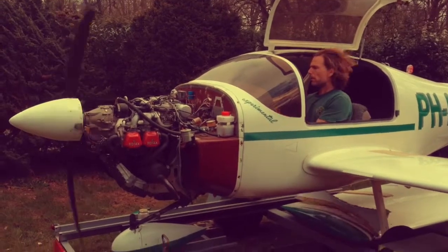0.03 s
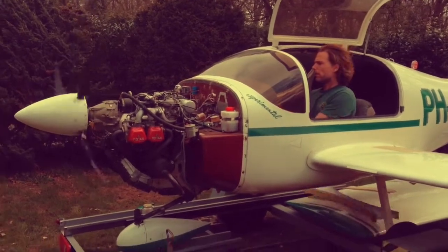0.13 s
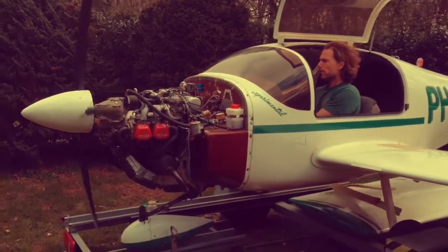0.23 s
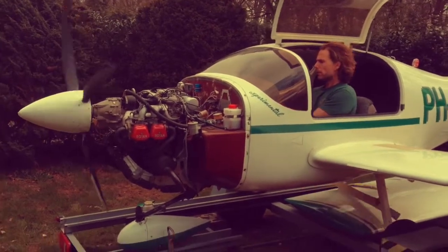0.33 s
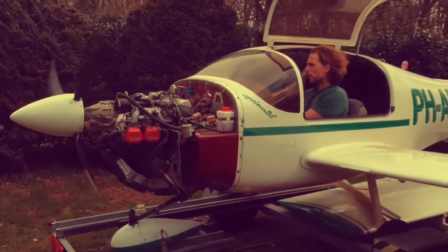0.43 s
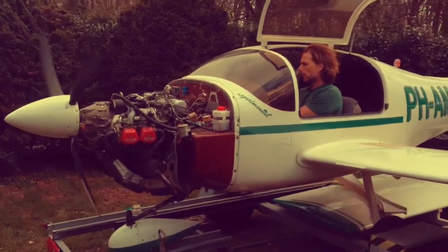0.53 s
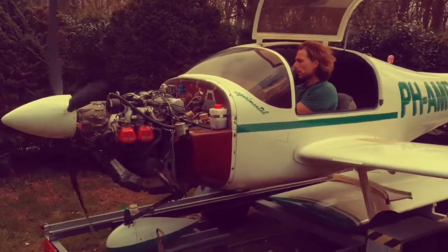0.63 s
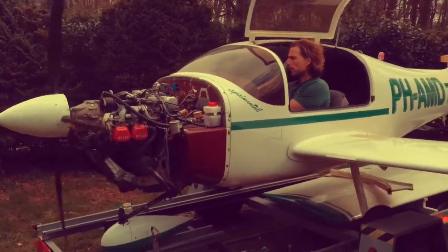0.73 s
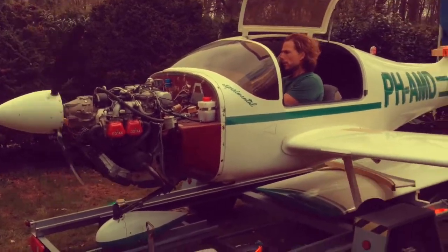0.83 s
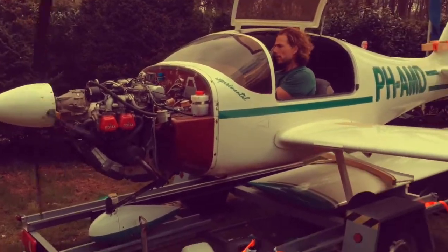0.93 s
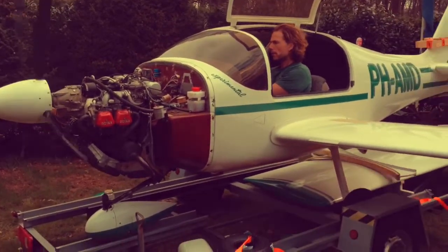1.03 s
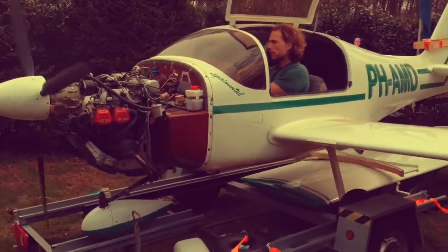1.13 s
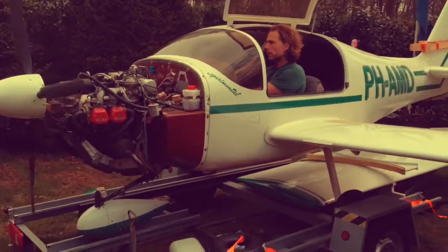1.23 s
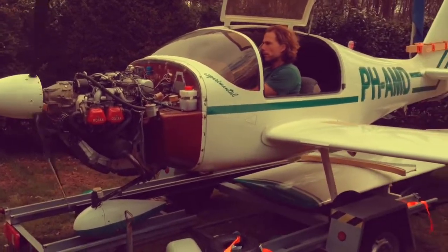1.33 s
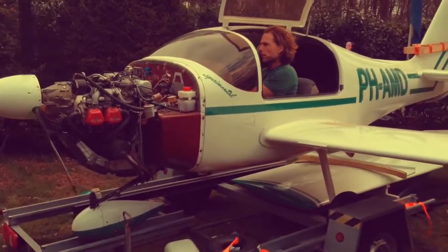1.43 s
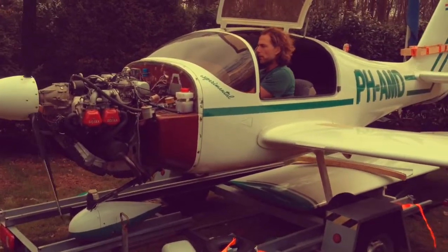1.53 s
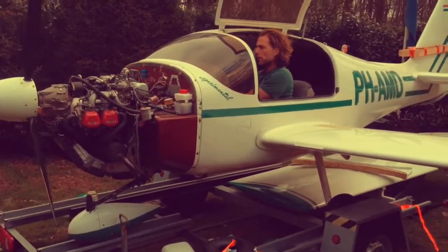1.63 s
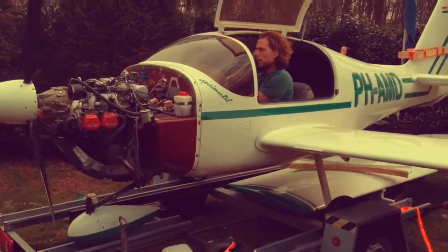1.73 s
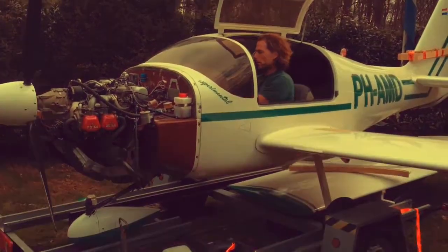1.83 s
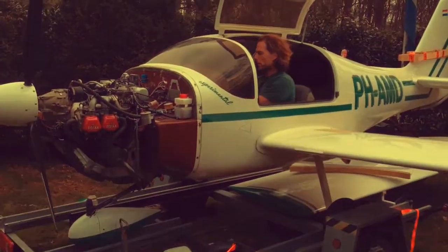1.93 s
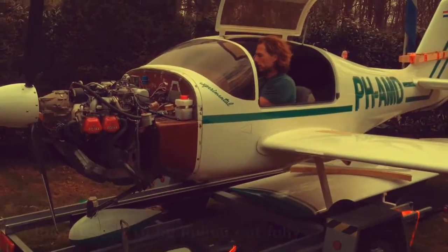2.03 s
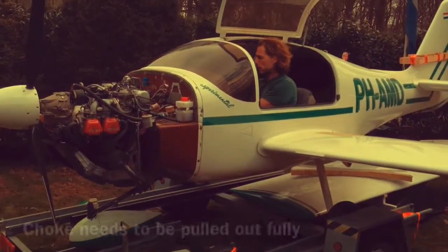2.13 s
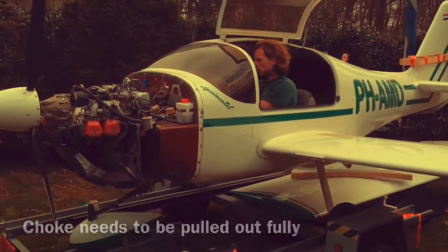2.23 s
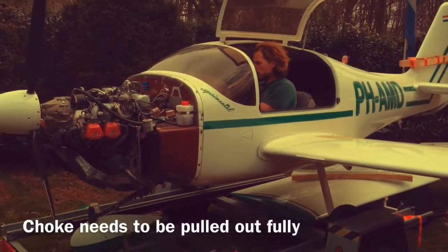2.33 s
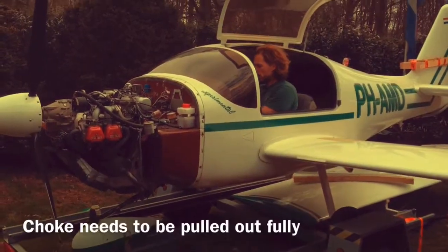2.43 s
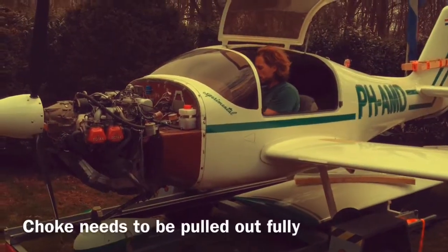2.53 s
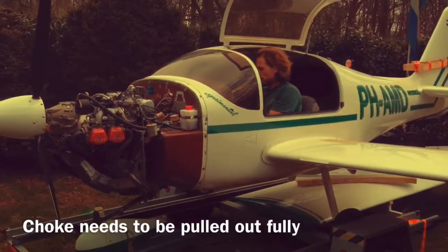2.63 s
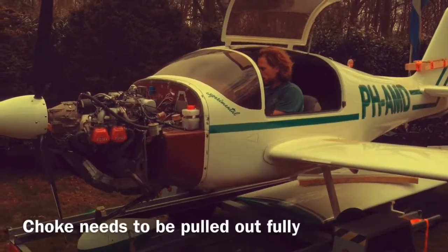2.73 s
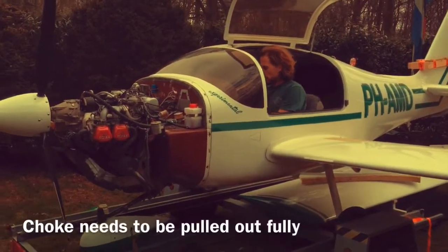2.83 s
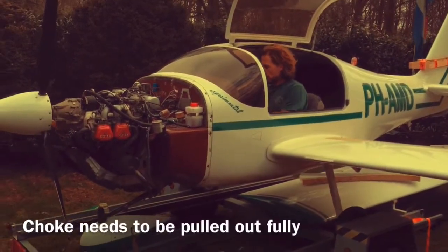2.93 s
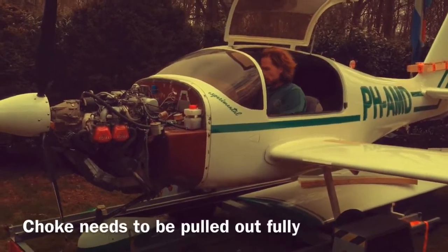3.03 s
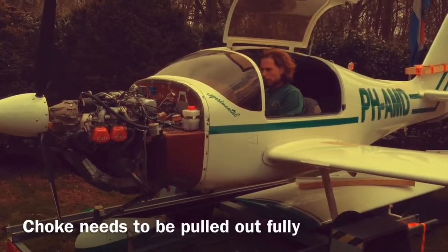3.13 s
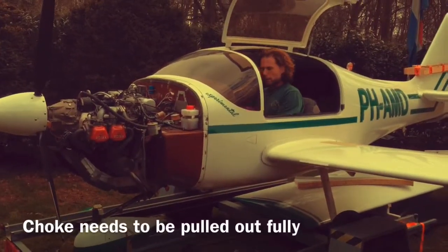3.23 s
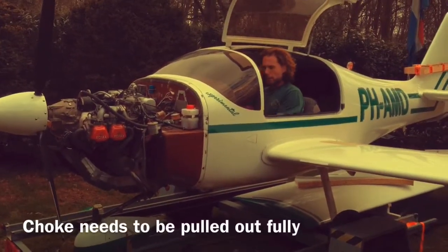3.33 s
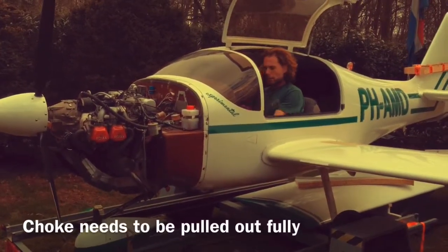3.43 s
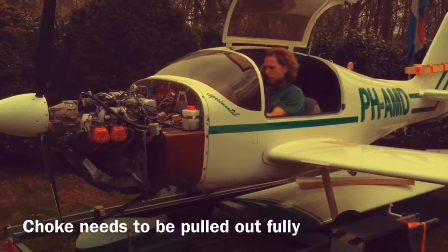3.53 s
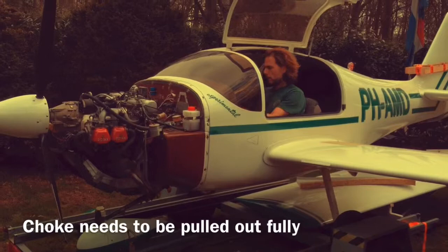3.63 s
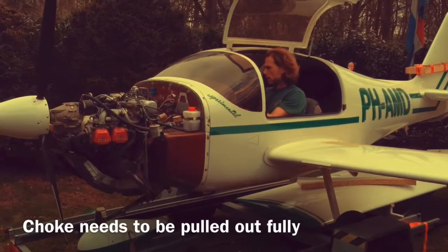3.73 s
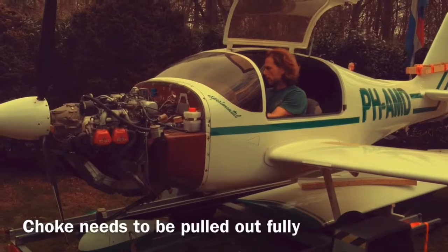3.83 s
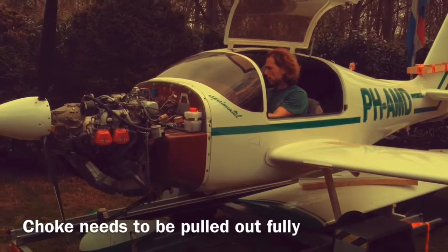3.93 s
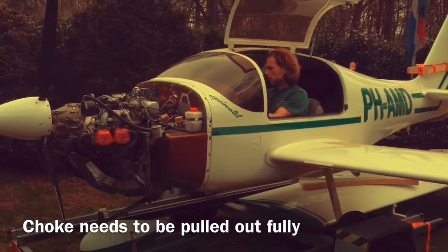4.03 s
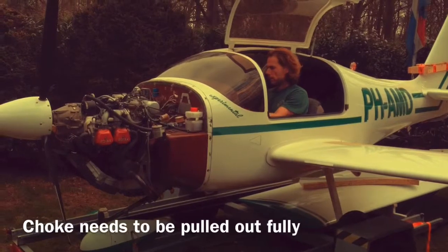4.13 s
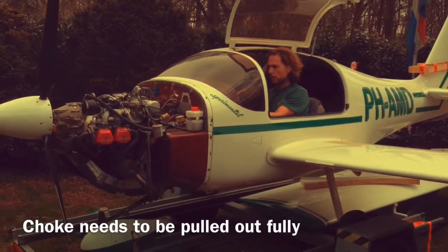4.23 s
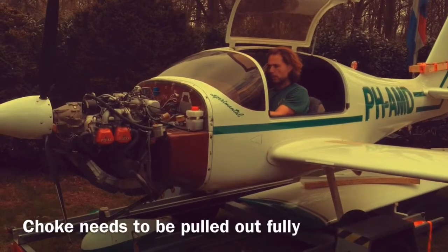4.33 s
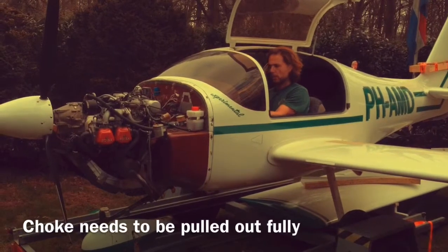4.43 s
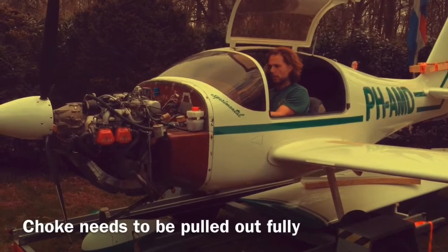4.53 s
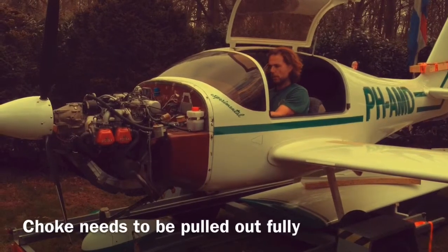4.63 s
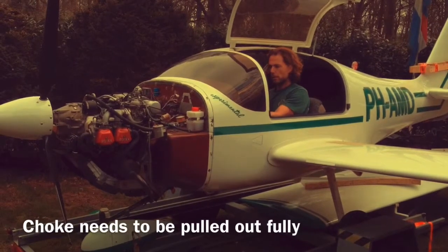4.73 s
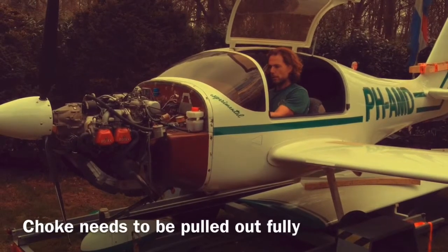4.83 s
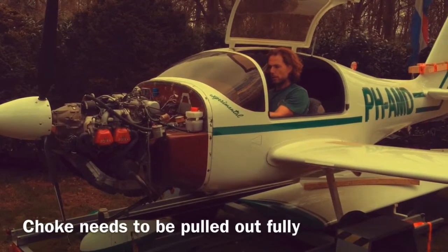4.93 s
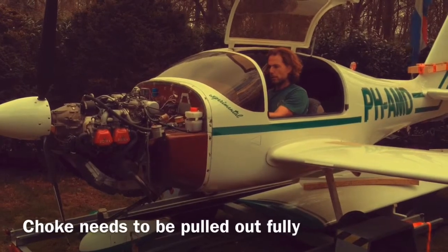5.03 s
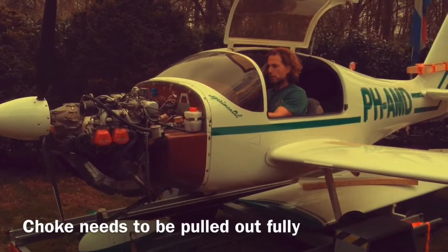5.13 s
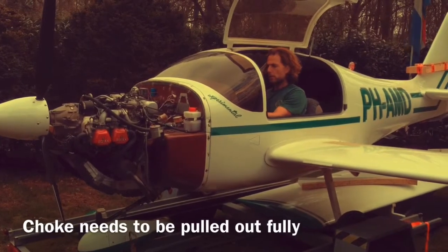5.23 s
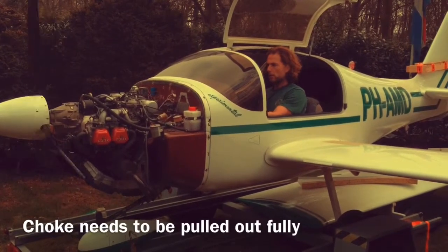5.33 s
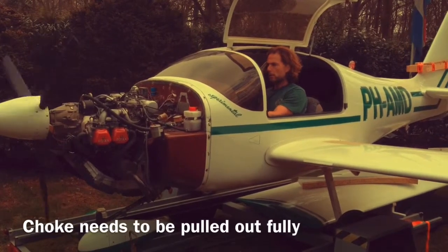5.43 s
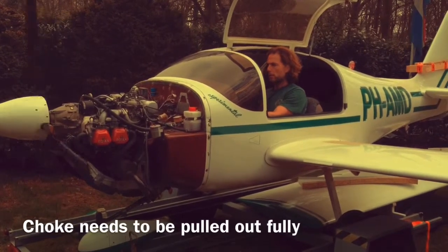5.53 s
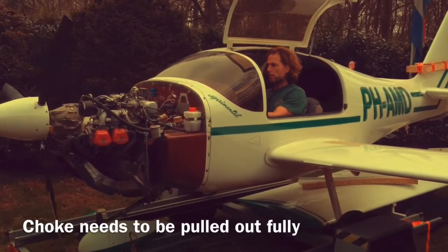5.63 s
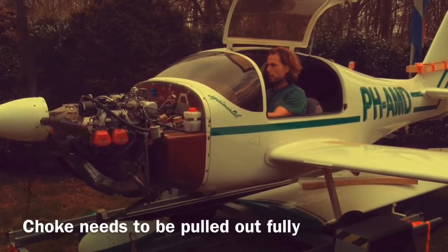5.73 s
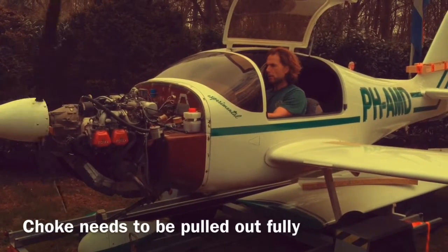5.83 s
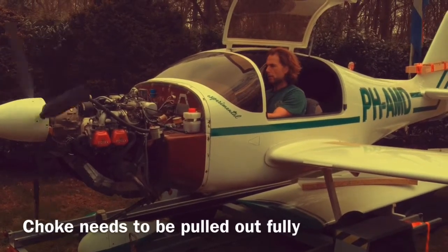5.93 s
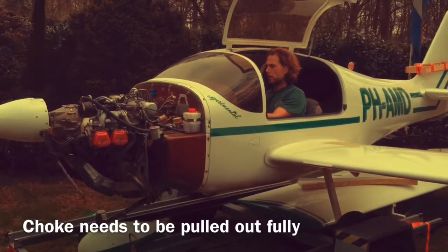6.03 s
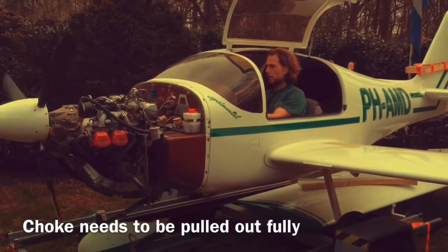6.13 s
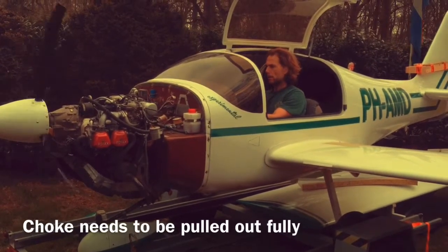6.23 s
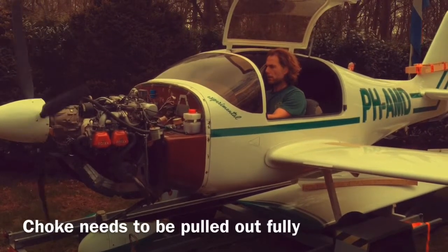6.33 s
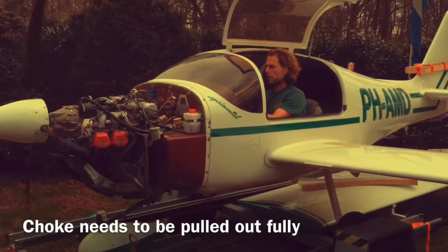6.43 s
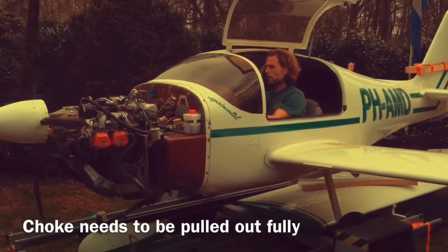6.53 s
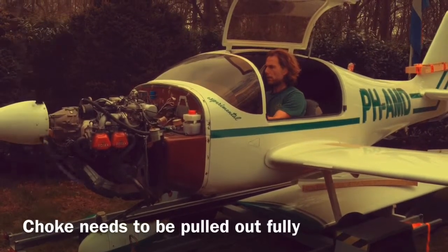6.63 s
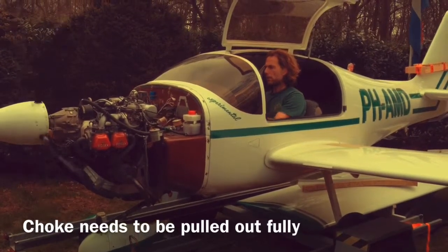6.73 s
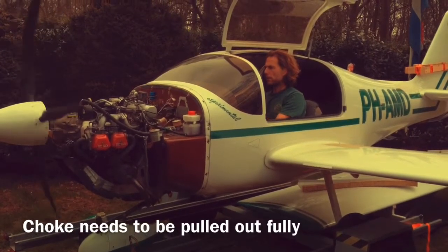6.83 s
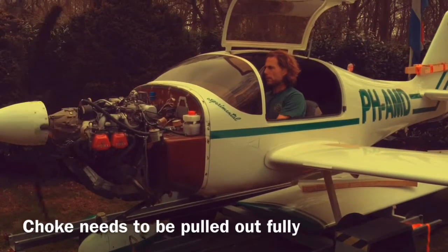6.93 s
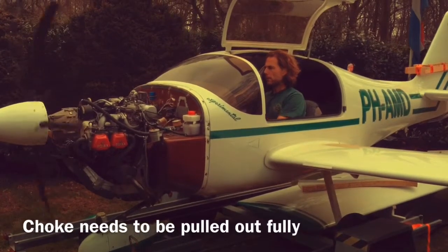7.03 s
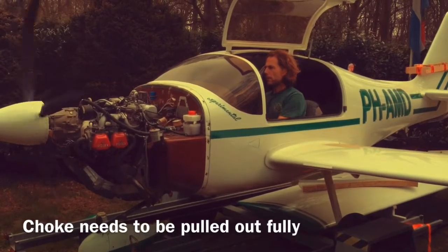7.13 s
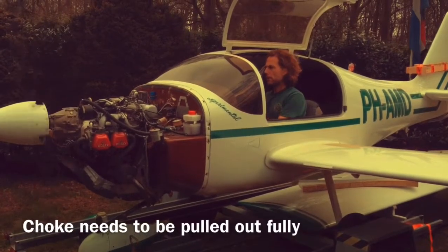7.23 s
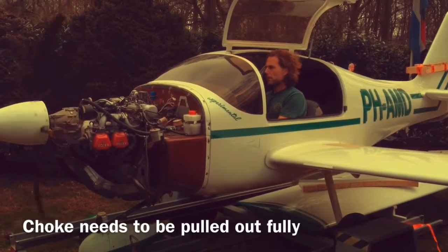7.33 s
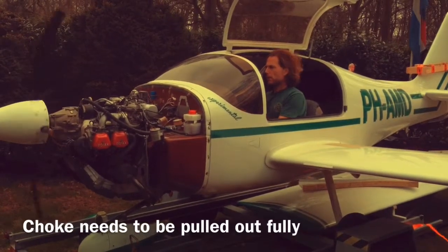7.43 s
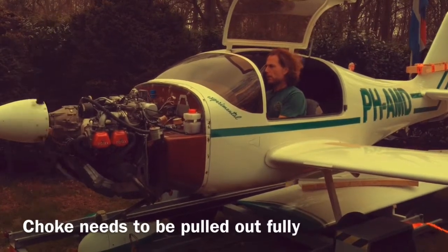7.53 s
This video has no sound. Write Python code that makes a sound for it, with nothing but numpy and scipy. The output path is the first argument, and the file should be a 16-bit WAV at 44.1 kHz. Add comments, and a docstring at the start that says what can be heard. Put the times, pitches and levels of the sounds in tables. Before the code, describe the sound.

A small aircraft piston engine sputters, knocks and dies; after a pause the starter whines and it fires again roughly.

```python
"""Light-aircraft engine in a garden

An uncowled four-cylinder on a trailer, a few metres from one microphone. It stumbles, the slack in its
propeller gearbox hammers, and it runs down. In the pause, faint birds and distant traffic. The starter
clicks in and whines through eight compressions; the engine fires, hammers again, picks up for a moment
and begins to falter."""
import sys
import numpy as np
from scipy import signal
from scipy.fft import rfft, irfft
from scipy.io import wavfile
from scipy.ndimage import uniform_filter1d

SR = 44100
rng = np.random.default_rng(int(sys.argv[2]) if len(sys.argv) > 2 else 0)


def dump_mix(stems):
    """Bounce the given channels to the path in sys.argv[1] as a 16-bit WAV at rate SR."""
    frames = np.atleast_2d(stems).T  # one column per channel
    limited = np.clip(frames, -1, 1)  # hard clip at full scale
    pcm = np.round(limited * 32767).astype(np.int16)
    wavfile.write(sys.argv[1], SR, pcm)


N = 333837
T = np.arange(N) / SR

# engine speed (time [s], firing rate [Hz])
FIRING_RATE = [(0, 62), (.3, 54), (.6, 42), (1, 33), (1.4, 22), (2.1, 12), (6.2, 15), (6.45, 36), (6.7, 47),
               (7, 60), (7.12, 66.5), (7.3, 70), (7.57, 65)]
# crankcase and gearbox modes (frequency [Hz], level [dB], nominal t60 [s])
CASING_MODES = [(614, -11.5, .11), (804, -4.5, 0.1), (888.5, 0.5, 0.09), (989, -3.5, .06), (1174, 0, 0.045),
                (1250, -7, 0.14), (1473, -12, 0.12), (1640, -5.5, 0.043), (1765.4, -1, 0.043),
                (1843, -7.5, 0.038), (1994, -2, 0.023), (2121, -3, 0.075), (2360, -8.5, 0.094),
                (3065, -12.5, 0.16), (3386, -12.5, 0.12), (3750, -21.5, .04)]
# a cranked piston passes the top of its compression (time [s], relative whine level [dB])
COMPRESSIONS = [(5.318, -39), (5.442, -20), (5.585, -18.5), (5.708, -21), (5.818, -18.5), (5.933, -19.5),
                (6.038, -16.5), (6.147, -21.5), (6.259, -16)]
# spectrum of the starter's gear train (frequency [Hz], level [dB])
GRIND_COLOUR = [(25, -29), (55, -9.5), (110, -13), (220, -18), (450, -15), (620, -9.5), (850, -0.5),
                (1090, -10), (1300, -9), (1480, -10.5), (1950, -6.5), (2760, -23.5), (3450, -17),
                (6600, -40), (15000, -68)]


def undb(db):
    """Decibels to gain."""
    return 10 ** (np.asarray(db) / 20)


def unit(x):
    """Scale to rms 1."""
    return x / np.sqrt(np.mean(x ** 2) + 1e-20)


def steady(x, size=4410):
    """Hold the short-term rms at 1."""
    return x / np.sqrt(np.abs(uniform_filter1d(x ** 2, size)) + 1e-4 * np.mean(x ** 2))


def curves(rows, at=T):
    """The later columns of a table, interpolated along the first."""
    axis, *columns = np.transpose(rows)
    return [np.interp(at, axis, column) for column in columns]


def gate(start, end, fade):
    """1 between two times, with sloping edges."""
    return np.clip((T - start) / fade, 0, 1) * np.clip((end - T) / fade, 0, 1)


def noise():
    """White noise."""
    return rng.standard_normal(N)


def walk(rate):
    """A random wander of rms 1 that turns `rate` times a second."""
    step = max(int(SR / rate), 1)
    stairs = np.repeat(rng.standard_normal(N // step + 1), step)
    return unit(uniform_filter1d(stairs, step)[:N])


def ring(x, hz, width):
    """One resonance, gain 1 at its centre."""
    return signal.lfilter(*signal.iirpeak(hz, hz / width, fs=SR), x)


def convolve(x, response):
    """Apply an impulse response with power gain 1."""
    return signal.fftconvolve(x, response / np.linalg.norm(response))[:N]


def colour(x, points, size=4096):
    """Minimum-phase filter through (frequency [Hz], level [dB]) points, with power gain 1."""
    hz, db = np.transpose(points)
    bins = np.maximum(np.fft.rfftfreq(size, 1 / SR), 1)
    cepstrum = irfft(np.log(undb(np.interp(np.log(bins), np.log(hz), db))))
    cepstrum[1:size // 2] *= 2
    cepstrum[size // 2 + 1:] = 0
    return convolve(x, irfft(np.exp(rfft(cepstrum))))


def casting(x, modes):
    """A metal casting rings at its modes when shaken by x."""
    click = signal.unit_impulse(SR // 8)
    response = sum((-1) ** k * undb(db) * ring(click, hz, 4 / decay)
                   for k, (hz, db, decay) in enumerate(modes))
    return convolve(x, response)


def blow(rise, t60, size=SR // 2):
    """Envelope of one impact, peak 1; rise and t60 in seconds."""
    t = T[:size]
    shape = (1 - np.exp(-t / rise)) * np.exp(-np.log(1000) * t / t60)
    return shape / shape.max()


def add(track, at, sound):
    """Mix a sound into a track from a time in seconds on."""
    part = track[int(at * SR):][:len(sound)]
    part += sound[:len(part)]


def blows(hits, rise, t60):
    """Envelope of a series of impacts (time [s], level [dB])."""
    force = np.zeros(N)
    for at, db in hits:
        add(force, at, undb(db) * blow(rise, t60))
    return force


def garden(hiss_db=-59, rumble_db=-61):
    """Distant traffic rumbles under a smooth hiss; both ebb a little."""
    # spectrum of the open air (frequency [Hz], level [dB])
    hiss_colour = [(12, -37), (20, -9), (53, -2), (80, 3), (183, -13.5), (796, -20.5), (889, -22),
                   (1590, -20), (2690, -28), (3270, -24), (15000, -32.5)]
    # ebb of the traffic (time [s], relative level [dB])
    traffic = [(2.6, 1.5), (3.3, 1), (3.8, -1.2), (4.6, -.3)]
    ebb_db, = curves(traffic)
    rumble = unit(ring(noise(), 60, 35.02) + .5 * ring(noise(), 130, 50))
    rumble *= undb(rumble_db + ebb_db + 1.5 * walk(6.4))
    return rumble + undb(hiss_db + .5 * ebb_db) * colour(noise(), hiss_colour)


def trees(x, t60):
    """Dull scatter from hedges, wing and trailer."""
    tail = blow(.02, t60) * rng.standard_normal(SR // 2)
    return convolve(x, signal.lfilter(*signal.butter(1, 3500, fs=SR), tail))


def birds(whistle_db=-74, twitter_db=-72.5, chirps=12, chirp_s=.09, chirp_octaves=-.25):
    """A far-off bird: warbled whistles and a high twitter of falling chirps, smeared by the trees."""
    # fluted notes (time [s], length [s], middle pitch [Hz], glide [octaves])
    whistles = [(3.004, 0.26, 3205, -.1), (3.501, .38, 3200, 0.11), (4.05, .28, 3150, -.2),
                (4.345, 0.07, 3000, .25), (4.429, 0.24, 2300, .3), (4.83, .13, 1750, 0.0024),
                (5.09, .2, 3100, -.3)]
    song, warble = np.zeros(N), 1 + .02 * walk(400)
    notes = [(*row, whistle_db) for row in whistles]
    notes += [(at, chirp_s, hz, chirp_octaves, twitter_db)
              for at, hz in zip(np.linspace(4.6, 6.6, chirps), rng.uniform(4300, 6460, chirps))]
    for at, length, middle_hz, glide, db in notes:
        progress = np.linspace(0, 1, int(length * SR))
        arch = np.abs(np.sin(np.pi * progress))
        octaves = glide * (progress - .5) + .05 * (arch - 1)
        hz = middle_hz * 2 ** octaves * warble[int(at * SR):][:len(arch)]
        add(song, at, undb(db) * np.sqrt(arch) * np.sin(2 * np.pi * np.cumsum(hz) / SR))
    song *= undb(3.5 * walk(45))
    return song + undb(-2) * trees(song, t60=.43)


def pump(at=1.755, rate_hz=17.1, tick_db=-54.5, fade_db_per_s=13):
    """A light, even ticking, likely the fuel pump, fades as the engine comes to rest."""
    ticks = [(at + s, tick_db - fade_db_per_s * s) for s in np.arange(18) / rate_hz]
    spectrum = [(100, -8.5), (300, 2.5), (900, 10), (1800, -6), (2700, -15.5), (5000, 2),
                (7000, -25), (15000, -32)]
    return colour(blows(ticks, rise=.001, t60=.04) * noise(), spectrum)


def settling_tick(at=2.833, db=-52):
    """One small metal part settles in the still engine."""
    spectrum = [(200, -2.5), (900, 0), (1800, -3), (2400, 1), (3200, -15), (8000, -28)]
    return colour(blows([(at, db)], rise=.0023, t60=.12) * noise(), spectrum)


def blades(at=1.365, ring_db=-41):
    """The last hard knock of the run-down leaves a faint ring, likely in the propeller blades."""
    # blade modes (frequency [Hz], relative level [dB], t60 [s])
    modes = [(540, 7, .75), (615, 5, 0.81), (760, -9, 1.4), (835, -11, 2.3), (880, -12, 2.4)]
    t = np.maximum(T - at, 0)
    tones = sum(undb(db - 60 * t / t60) * np.sin(2 * np.pi * hz * t) for hz, db, t60 in modes)
    return tones * undb(ring_db + 2 * walk(25))


def clunks(thud_db=-1, hub_db=-4):
    """The propeller rocks back; the gears take up their play with a double clunk that rings the hub."""
    # the gears meet (time [s], relative level [dB])
    contacts = [(2.244, -30), (2.267, -38)]
    # propeller hub modes (frequency [Hz], level [dB], nominal t60 [s])
    hub_modes = [(316, -2, .17), (485, 0, .15), (845, -4, .2), (1430, -9, 0.12), (1740, -6, .14),
                 (2293, -13, .1)]
    force = blows(contacts, rise=.0041, t60=.067)
    dull = [(70, -18), (170, -2), (380, 0), (850, -4.5), (1300, -10), (2100, -7), (2900, -23),
            (5500, -28), (15000, -49)]
    thud = undb(thud_db) * colour(force * noise(), dull)
    return thud + undb(hub_db) * casting(force * noise(), hub_modes)


def shudders(panel_hz=178):
    """At low speed the shaking engine sets an airframe panel humming."""
    # spells of humming (start [s], end [s], level [dB])
    spells = [(0.756, 0.86, -22.5), (6.402, 6.62, -19.5)]
    hz = panel_hz * (1 + .071 * walk(50))
    hum = np.sin(2 * np.pi * np.cumsum(hz) / SR) * undb(2 * walk(40))
    return hum * sum(undb(db) * gate(start, end, .074) for start, end, db in spells)


def cranking_breath(db=-47, hz=68, width_hz=45):
    """The cranked pistons push unburnt air through the silencer."""
    breath = unit(ring(ring(noise(), hz, width_hz), hz, 2 * width_hz))
    return undb(db) * gate(COMPRESSIONS[0][0], COMPRESSIONS[-1][0], .06) * breath


def gear_rattles(bite_s=5.383, bite_db=-22, lag_s=.017, rattle_db=-26):
    """Slack in the gear train is taken up as the starter bites, then just after compressions let go."""
    hits = [(bite_s, bite_db)] + [(top + lag_s, rattle_db) for top, _ in COMPRESSIONS[1:-1]]
    return colour(blows(hits, rise=.0037, t60=.068) * noise(), GRIND_COLOUR)


def solenoid(at=5.3165, snap_db=-23, thud_db=-27):
    """The starter contactor snaps shut and the pinion bumps home."""
    snap = blows([(at, snap_db)], rise=.0002, t60=.028) * noise()
    thud = blows([(at, thud_db)], rise=.0015, t60=.14) * noise()
    bright = [(100, -20), (700, 9.5), (2500, -5), (5000, 1), (9000, 1.5), (15000, -10)]
    return colour(snap, bright) + colour(thud, GRIND_COLOUR)


def starter(whine_db=-1.5, grind_db=-26, brush_db=-42):
    """The motor labours into each compression and spurts after it; its gear teeth whine and grind."""
    # one compression (share of the stroke [0-1], mesh rate once up to speed [Hz], load [dB])
    stroke = [(0, 850, -20), (.15, 1000, -10), (.35, 965, -5), (.55, 915, 0), (.78, 835, -5), (1, 780, -20)]
    # partials of the whine (multiple of the mesh rate, relative level [dB])
    gear_tones = [(1, 0), (2, -4.5), (16 / 7, -10), (3, -22), (4, -19)]
    tops, stroke_db = np.transpose(COMPRESSIONS)
    share = np.interp(T, tops, np.arange(len(tops))) % 1
    hz, load_db = curves(stroke, share)
    hz *= np.interp(T, [5.32, 5.5, 5.8], [.92, .99, 1])  # spinning up
    hz *= (1 + .014 * walk(12)) * (1 + .011 * walk(250))
    mesh = 2 * np.pi * np.cumsum(hz) / SR
    # the pinion runs slightly off centre and presses harder once a turn
    press = 1 + .22 * np.sin(mesh / 14 + walk(40))
    whine = sum(undb(db + 2 * walk(170)) * np.sin(k * mesh) for k, db in gear_tones)
    whine *= undb(whine_db + np.interp(T, tops, stroke_db) + load_db)
    teeth = unit(noise() * (1 + .49 * np.cos(mesh)) * undb(walk(200)))
    fizz = [(3000, -1.5), (7000, -5), (10000, -1.5), (15000, -18)]
    brushes = colour(noise() * undb(3.1 * walk(60)), fizz)
    grind = undb(grind_db) * colour(teeth, GRIND_COLOUR) + undb(brush_db) * brushes
    return gate(5.316, 6.27, .0033) * press * (whine + grind * undb(.38 * load_db))


def effort_at(at):
    """How hard combustion drives the crank."""
    # drive on the crank (time [s], effort [0-1])
    effort = [(0, 0.69), (.55, .68), (.9, 0.46), (1.1, 0.01), (6.15, 0), (6.23, .98), (7.32, 0.86),
              (7.43, 0.56), (7.57, 0.76)]
    return curves(effort, at)[0]


def loudness(law, idle_hz=60, coast_s=1.384, stop_s=2.7, catch_s=6.2):
    """Gain of one part of the engine: it grows with speed and effort and dies away while coasting."""
    idle_db, octave_db, effort_db, fade_db = law
    octaves = np.log2(curves(FIRING_RATE)[0] / idle_hz)
    coasted_s = np.maximum(T - coast_s, 0) * (T < catch_s)
    turning = gate(-1, stop_s, .12) + gate(catch_s, 9, .038)
    return turning * undb(idle_db + octave_db * octaves + effort_db * effort_at(T) - fade_db * coasted_s)


def throttle_air(hz, gas, even):
    """Air rushes past the throttle; under even firing it whistles, higher as the engine speeds up."""
    # loudness (at idle [dB], speed [dB/octave], full effort [dB], coasting loss [dB/s])
    law = (-45, 12, 14, 45)
    # spectrum of the rush (frequency [Hz], level [dB])
    spectrum = [(1500, -19), (2800, -2.5), (3600, 12), (4400, 6), (7000, 0), (11000, -2), (15000, -12.5)]
    rush = unit(colour(noise() + .43 * gas, spectrum))
    whistle_hz = 3660 * np.sqrt(hz / 67) * (1 + .013 * walk(500))
    whistle = np.sin(2 * np.pi * np.cumsum(whistle_hz) / SR) * undb(-7 + 3.9 * walk(80))
    return loudness(law) * (rush + even * whistle)


def clatter(cycles, strength, gas, case_db=-7, coast_db=4):
    """Valves tick twice a firing and the crankcase rings; coasting, the parts meet softly and dully."""
    # loudness (at idle [dB], speed [dB/octave], full effort [dB], coasting loss [dB/s])
    law = (-28.5, 0.3, 5, 66.5)
    # spectra of the ticking, running and coasting (frequency [Hz], level [dB])
    running_colour = [(88, -36), (150, 0), (404, 0), (467, -8.5), (593, -0.5), (700, -12.5), (781, 2),
                      (973, -16), (1190, -3), (1350, -7.5), (1780, -2), (2770, -17), (3580, -11),
                      (4140, -21.5), (12000, -37), (15600, -66), (22000, -120)]
    coasting_colour = [(100, -0.5), (200, 5), (450, -4.5), (620, 2), (830, 0), (1050, -4), (1850, -5),
                       (2700, -22.5), (3400, -18), (6000, -28.5), (15000, -50.5)]
    taps = strength * np.exp(-(2 * cycles % 1) / .15)
    ticks = steady(noise() * undb(2 * walk(500)) * (1.1 + taps))
    bright = colour(ticks, running_colour) + undb(case_db) * casting(gas, CASING_MODES)
    dull = undb(coast_db) * colour(ticks, coasting_colour)
    coasting = gate(1.26, 3, .17)
    return loudness(law) * ((1 - coasting) * bright + coasting * dull)


def intake(cycles, strength, gas, resonance_hz=411.5, trim_db=-3):
    """The intake honks, and sings when the sixth order of the firing rate reaches its resonance."""
    # loudness before the trim (at idle [dB], speed [dB/octave], full effort [dB], coasting loss [dB/s])
    law = (-30.5, 11.5, 5.5, 36)
    song = ring(strength * np.sin(6 * 2 * np.pi * cycles), resonance_hz, 40)
    honk = steady(ring(ring(gas, 385, 200), 370, 260))
    # the carburettor nearer the microphone gulps every second firing
    gulp = 1 + .65 * np.sin(np.pi * cycles + .6 * walk(25))
    return undb(trim_db) * loudness(law) * steady(gulp * (.5 * honk + 1.58 * song))


def exhaust(hz, cycles, strength, gas, even, silencer_hz=106, width_hz=17, trim_db=-2):
    """Ragged firing puffs, even firing drones; the silencer booms as the second order meets its pitch."""
    # loudness before the trim (at idle [dB], speed [dB/octave], full effort [dB], coasting loss [dB/s])
    law = (-25.3, 6, 5.5, 29.5)
    # spectrum at the tailpipe (frequency [Hz], level [dB])
    spectrum = [(20, -28), (40, -4.5), (62, 4), (105, 3.5), (150, -9.5), (185, -12), (260, -11),
                (500, -30.5), (1500, -64.5)]
    pulses = unit(np.diff(cycles.astype(int), prepend=0) * strength)
    puffs = steady(colour(.697 * pulses + gas, spectrum))
    boom_db = 7 * np.exp(-((2 * hz - silencer_hz) / width_hz) ** 2)
    orders = sum(np.sin(2 * np.pi * k * cycles) * undb(curves(spectrum, k * hz)[0] + (k == 2) * boom_db)
                 for k in range(1, 5))
    drone = steady(orders * strength) * undb(boom_db / 2)
    return undb(trim_db) * loudness(law) * (np.sqrt(even) * drone + np.sqrt(1 - even) * puffs)


def engine():
    """Each firing, of random strength, sends a burst of gas through exhaust, intake and crankcase."""
    # how evenly the cylinders fire (time [s], evenness [0-1])
    evenness = [(0, .4), (.3, 0), (6.4, .1), (6.65, 0), (6.8, 0.7), (7.35, .85), (7.5, 0.2)]
    even, = curves(evenness)
    hz, = curves(FIRING_RATE)
    cycles = np.cumsum(hz * (1 + .01 * walk(30))) / SR  # one cycle a firing
    strength = undb(3 * (1 - .15 * even) * rng.standard_normal(1024)[cycles.astype(int)])
    gas = steady(strength * np.exp(-(cycles % 1) / .54)) * noise()
    return (exhaust(hz, cycles, strength, gas, even) + intake(cycles, strength, gas)
            + clatter(cycles, strength, gas) + throttle_air(hz, gas, even))


def lone_firings(boom_hz=82, honk_hz=395):
    """A lone cylinder catches: the silencer booms and the intake honks."""
    # strong firings (time [s], relative boom level [dB], honk level [dB])
    catches = [(0.009, -16.5, -18), (0.033, -10.5, -27.5), (0.097, -10.5, -27.5), (0.148, -14.5, -23.5),
               (0.164, -21, -20.5), (0.222, -15.5, -17.5), (0.297, -18.5, -17), (0.754, -12.5, -30.5),
               (0.859, -15, -33.5), (6.727, -15, -25), (6.755, -15, -32), (7.477, -12.5, -18),
               (7.559, -12, -18)]
    out = np.zeros(N)
    for at, boom_db, honk_db in catches:
        detune = 1 + .04 * rng.standard_normal()
        turn = 2 * np.pi * detune * T[:SR // 2]
        boom = blow(.004, .07) * np.sin(boom_hz * turn)
        honk = blow(.012, .065) * (np.sin(honk_hz * turn) + .4 * np.sin(2 * honk_hz * turn))
        add(out, at, undb(boom_db - 1) * boom + undb(honk_db) * honk)
    return out


def clank(favoured_hz):
    """The casing rings after one blow; modes near the favoured pitch speak louder and linger."""
    out, t = 0, T[:SR // 6]
    for hz, db, t60 in CASING_MODES:
        detune, size, phase = rng.standard_normal(3)
        near = np.exp(-(np.log(hz / favoured_hz) / .11) ** 2)
        tone = np.sin(2 * np.pi * (hz * (1 + .018 * detune) * t + phase))
        envelope = blow(.003, t60 * (1 + .3 * near), len(t))
        out += undb(db + 2.6 * size + 9 * near) * envelope * tone
    return out / np.sqrt(uniform_filter1d(out ** 2, size=200).max())


def gearbox_knocks(ring_db=-2, body_db=-6, slack_hz=790, driven_hz=1818, rebound_bite=4):
    """The drive dogs scrape up their ramps, slam home and rebound: a crack, a ringing case, a shake."""
    # backlash (time [s], blow [dB], rebound delay [s], rebound [dB], crack against either hit [dB])
    backlash = [(.132, -22.5, 0.037, -18.5, -9), (.298, -20.5, 0.05, -15, -9.5),
                (.365, -7.5, 0.036, -12, -11), (.431, -13, .034, -11.5, -11), (.503, -16, .033, -14.5, -9),
                (.587, -14, 0.037, -13.5, -15.5), (.677, -11.5, 0.03, -10.5, -13),
                (.76, -10, .038, -11.5, -12), (.858, -10.5, 0.035, -8.5, -16),
                (.968, -14.5, .032, -8.5, -12.5), (1.359, -12, .052, -16.5, -19),
                (1.549, -48, 0.055, -32.5, -18), (6.233, -9, 0.011, -16.5, -23),
                (6.287, -9, .024, -7, -10.5), (6.375, -9.5, 0.0095, -25, -13),
                (6.428, -11.5, 0.028, -9.5, -11), (6.528, -15.5, 0.028, -10.5, -12),
                (6.598, -12.5, .029, -10, -13), (6.697, -22, 0.046, -21, -12), (7.528, -15, 0.03, -12, -15)]
    # spectrum of a knock's body (frequency [Hz], level [dB])
    body_colour = [(88, -35.5), (150, -6), (178, -1.5), (221, -9), (312, -4), (441, -13.5), (612, -1),
                   (1030, -8.5), (1180, -5.5), (1380, -5), (1770, 3), (2650, -22.5), (3600, -19.5),
                   (6940, -39), (15000, -51.5)]
    crack_colour = [(1500, -31.5), (2800, -5.5), (3600, 3), (5000, -6), (8000, -19.5), (15000, -25)]
    body, crack, rings = np.zeros((3, N))
    for start, blow_db, delay, rebound_db, crack_db in backlash:
        effort = effort_at(start)
        # harder drive rings higher modes, and the rebound bites harder than the blow
        for at, db, drive in (start, blow_db, effort), (start + delay, rebound_db, rebound_bite * effort):
            add(rings, at, undb(db) * clank(np.interp(drive, [0, 1], [slack_hz, driven_hz])))
            add(body, at - .007, undb(db - 9) * blow(.006, .05))  # scrape
            add(body, at, undb(db) * blow(.003, .085))  # slam
            add(body, at, undb(db - 14) * blow(.012, .13))  # loose fittings shake
            add(crack, at, undb(db + crack_db) * blow(.001, .07))
    return (undb(ring_db) * rings + undb(body_db) * colour(body * noise(), body_colour)
            + colour(crack * noise(), crack_colour))


def scene(echo_db=-22):
    """The aircraft a few metres off, its faint echo and the garden behind, in mono."""
    aircraft = engine() + lone_firings() + gearbox_knocks() + shudders()
    aircraft += blades() + clunks() + settling_tick() + pump()
    aircraft += solenoid() + starter() + gear_rattles() + cranking_breath()
    return (aircraft + undb(echo_db) * trees(aircraft, t60=.27) + birds() + garden())[None]


def record(dry, low_hz=36, top_hz=15550):
    """The microphone drops the deepest bass, peaks clip at full scale, and the top is cut."""
    thin = signal.sosfilt(signal.butter(3, low_hz, "high", fs=SR, output="sos"), dry)
    return signal.sosfilt(signal.ellip(10, .2, 70, top_hz, fs=SR, output="sos"), np.clip(thin, -1, 1))


dry = scene()
out = record(dry)
dump_mix(out)
```